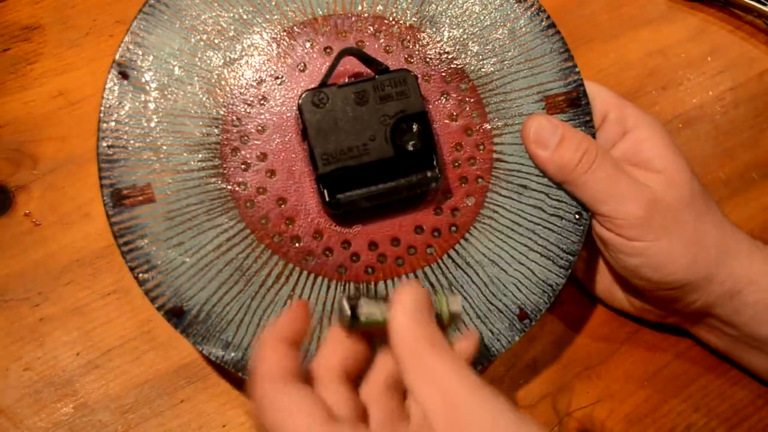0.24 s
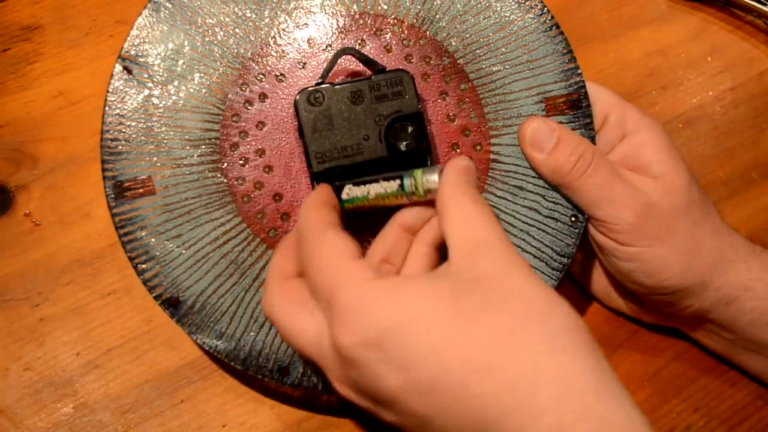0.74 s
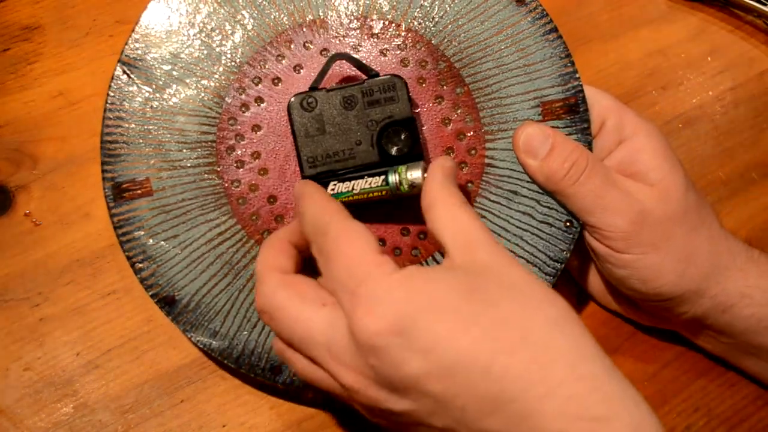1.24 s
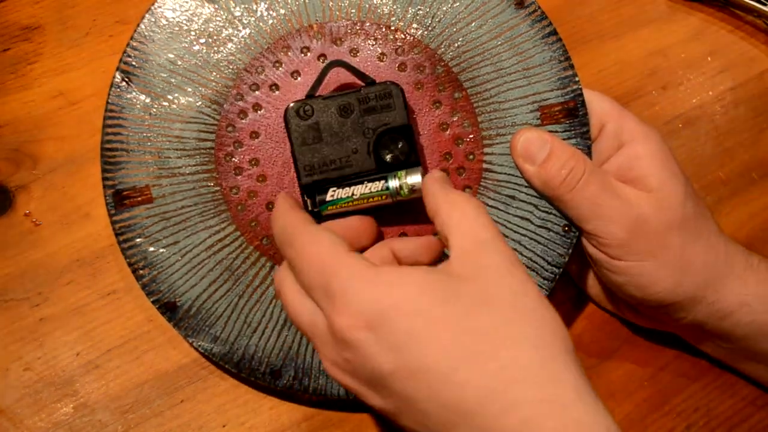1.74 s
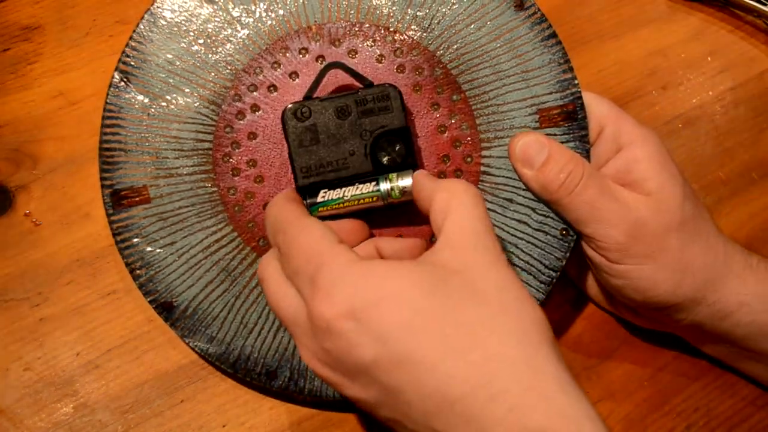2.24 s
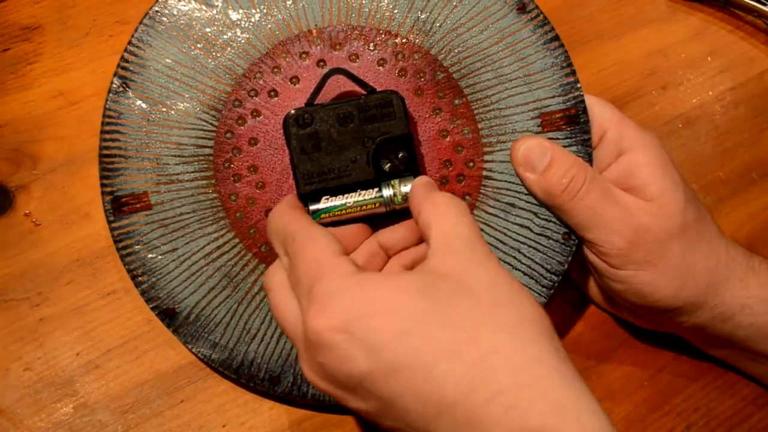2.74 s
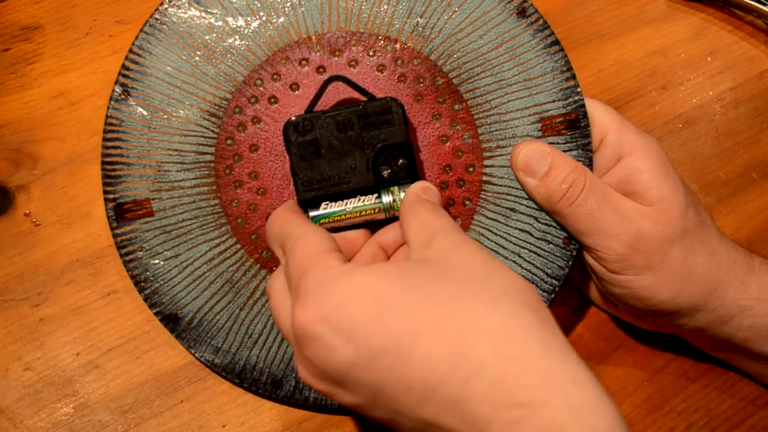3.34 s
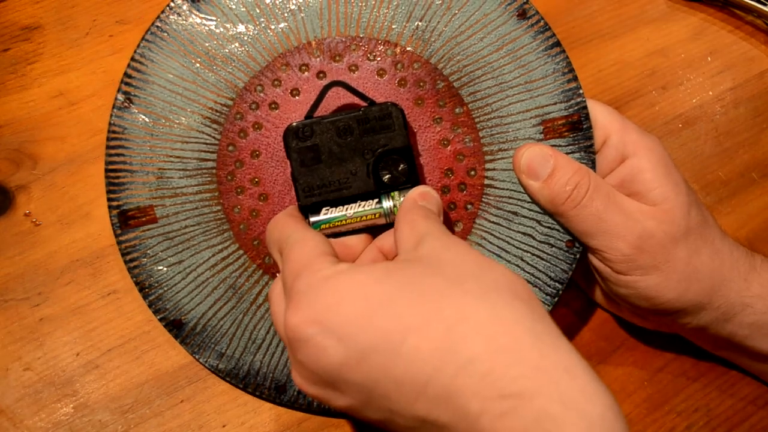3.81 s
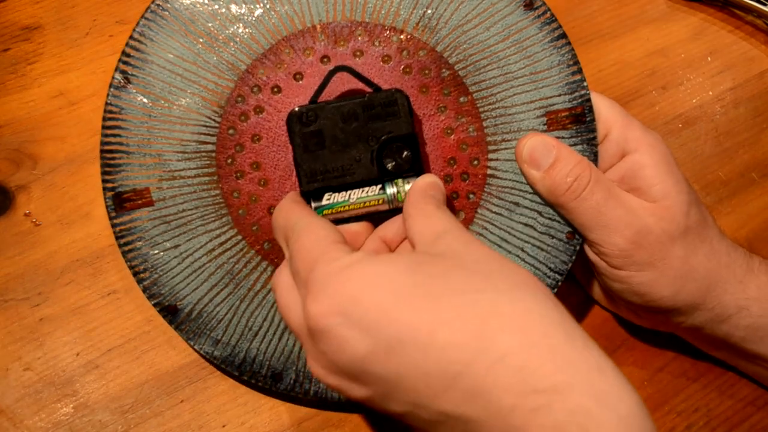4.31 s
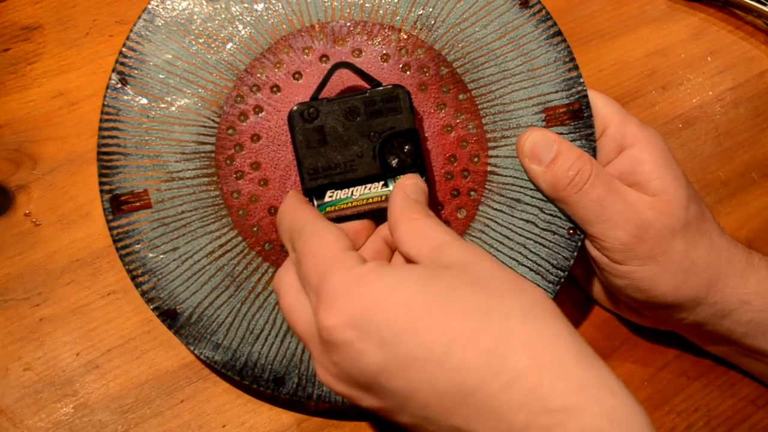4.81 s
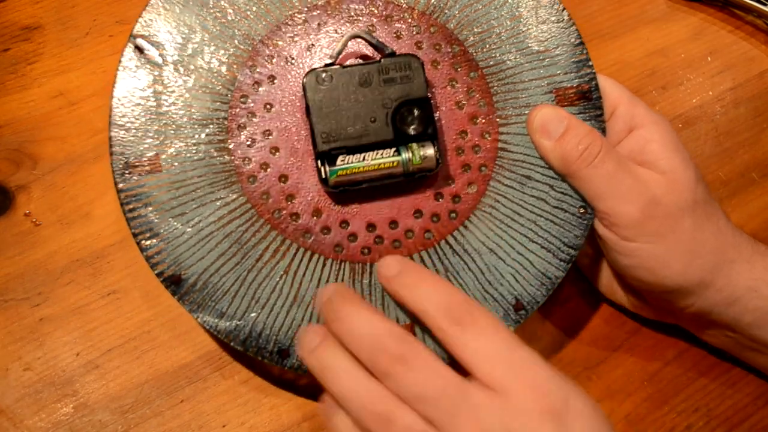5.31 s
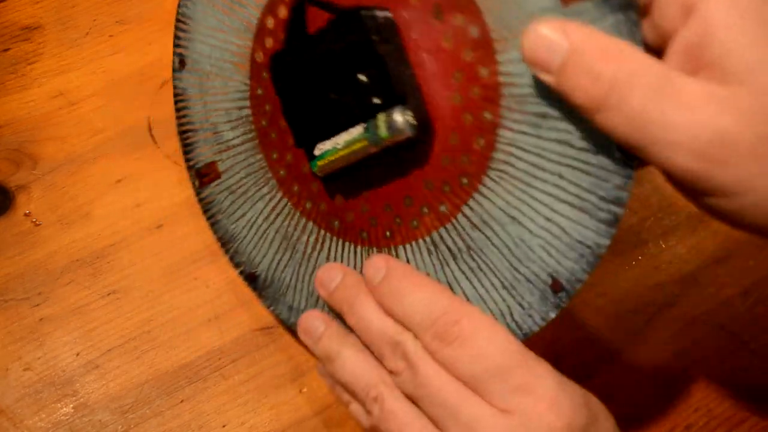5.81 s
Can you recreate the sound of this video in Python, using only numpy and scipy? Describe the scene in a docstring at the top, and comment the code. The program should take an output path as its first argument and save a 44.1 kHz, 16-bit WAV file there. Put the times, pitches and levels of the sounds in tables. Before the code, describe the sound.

Sparse plastic knocks and metallic ticks grow into a loud snap on a resonant ceramic plate, then a small clink, in a quiet small room.

```python
"""Room air rumbles and hisses throughout, with a thin high whistle: coloured noise and a sine.
A battery is pressed into the plastic holder on the back of a ceramic plate clock over a wooden bench.
Each contact ticks, knocks the holder and plate, and rings out in a small room: noise and dying sines.
Between and during contacts, short strokes of grainy noise slide; harder pushes bump the bench.
At the end the rim clinks: a ring of its own modes with a metal tick."""
import sys
import numpy as np
from scipy import signal
from scipy.fft import rfft, irfft, next_fast_len
from scipy.io import wavfile
from scipy.ndimage import map_coordinates

SR = 44100
rng = np.random.default_rng(int(sys.argv[2]) if len(sys.argv) > 2 else 0)


def dump_mix(stems):
    """Bounce the given channels to the path in sys.argv[1] as a 16-bit WAV at rate SR."""
    frames = np.atleast_2d(stems).T  # one column per channel
    limited = np.clip(frames, -1, 1)  # hard clip at full scale
    pcm = np.round(limited * 32767).astype(np.int16)
    wavfile.write(sys.argv[1], SR, pcm)


def nominal_scale(level):
    """Amplitude ratio for a level in decibels (scalar or array-like)."""
    x = np.asarray(level, float) / 20
    return 10 ** x


N = 267246  # length in samples


def along(points, hz):
    """Reads a curve of (pitch, value) points at any pitch, with pitch on a log axis."""
    point_hz, value = np.transpose(points)
    return np.interp(np.log(hz + 1), np.log(point_hz + 1), value)


def filtered(x, response):
    """Colours a sound by multiplying its spectrum by a response that depends on frequency."""
    size = next_fast_len(len(x) + 8192)
    spectrum = rfft(x, size) * response(np.fft.rfftfreq(size, 1 / SR))
    return irfft(spectrum, size)[:len(x)]


def unit(x):
    """Scales a sound to an rms level of 1."""
    return x / np.sqrt(np.mean(x ** 2) + 1e-20)


def wobble(rate):
    """Draws a smooth random curve through rate random points a second."""
    points = rng.standard_normal(int(N * rate / SR) + 4)
    return map_coordinates(points, [np.arange(N) * rate / SR])


def air():
    """Room air: wavering low rumble, hiss with humps as of a fan or pipe, and a thin whistle."""
    # shape of the rumble's spectrum: pitch_hz, relative level_db (per Hz)
    rumble_colour = [(12, -41.5), (20, -4.5), (22, -17.5), (33, -26), (70, -10), (97, -10), (131, -2.5),
                     (150, 0.5), (193, -7.5), (226, -7), (256, -14), (283, -13.5), (300, -13), (390, -43),
                     (660, -120)]
    # average level of the rumble over time: time_s, level_db (rms)
    rumble_level = [(0, -59), (.45, -60), (1, -62), (2.3, -65), (3.5, -68), (5.2, -67.5), (6.06, -67)]
    # shape of the hiss's spectrum without humps: pitch_hz, relative level_db (per Hz)
    hiss_colour = [(120, -34.5), (200, -6), (440, -4), (481, -4), (870, -4.5), (1020, 0), (1240, -4.5),
                   (1390, -5.5), (2370, -13.5), (2940, -13), (5710, -28.5), (12600, -35), (14500, -51.5)]
    # humps in the hiss: centre_hz, width_hz, level_db (of the part added, against the plain hiss)
    hiss_humps = [(965, 33, 2.5), (1880, 100, -5), (2940, 110, -2), (3520, 32, 9.5)]
    # whistle tones: pitch_hz, average level_db (rms)
    whistle_tones = [(15665, -80)]
    t = np.arange(N) / SR

    rumble = unit(filtered(rng.standard_normal(N), lambda hz: nominal_scale(along(rumble_colour, hz))))
    rumble_db = np.interp(t, *np.transpose(rumble_level)) + 0.53 * wobble(6.6)

    def humped(hz):
        humps = sum(nominal_scale(db) / (1 + (2 * (hz - centre_hz) / width_hz) ** 2)
                    for centre_hz, width_hz, db in hiss_humps)
        return nominal_scale(along(hiss_colour, hz)) * (1 + humps)

    hiss = unit(filtered(rng.standard_normal(N), humped))
    hiss_db = -60.5 + 0.4 * wobble(5)

    # the square root of 2 turns an rms level into the height of a sine
    whistle = sum(np.sqrt(2) * nominal_scale(db + 0.6 * wobble(12)) * np.sin(2 * np.pi * hz * t)
                  for hz, db in whistle_tones)
    return nominal_scale(rumble_db) * rumble + nominal_scale(hiss_db) * hiss + whistle


def ring(modes, scatter_db, attack):
    """Dying sines struck together, with randomly scattered strengths; attack in s, peak 1."""
    t = np.arange(SR // 2) / SR
    hz, db, t60 = np.transpose(modes)[:, :, None]
    db = db + scatter_db * rng.standard_normal(db.shape)
    sines = nominal_scale(db - 60 * t / t60) * np.sin(2 * np.pi * hz * t)
    x = np.sum(sines, axis=0) * (1 - np.exp(-t / attack))
    return x / np.max(np.abs(x))


def room(x):
    """The small room: a fresh tail of fading noise for each blow, after the first walls answer."""
    # how fast the room dies away: pitch_hz, t60_s (time to fall by 60 dB)
    room_decay = [(200, 0.32), (850, 0.19), (2000, 0.19), (5000, 0.19), (10000, 0.16), (15000, 0.12)]
    # colour of the room's answer: pitch_hz, level_db
    room_colour = [(200, -5), (900, -9.5), (1500, -10), (2500, -8.5), (5000, -11), (10000, -3.5),
                   (15000, -8)]
    hz, t, z = signal.stft(rng.standard_normal(SR // 2), SR, nperseg=256)
    fade = nominal_scale(-60 * t / along(room_decay, hz)[:, None])
    # equal energy at every pitch, so that only room_colour sets the balance
    fade /= np.sqrt(np.sum(fade ** 2, axis=1, keepdims=True))
    tail = signal.istft(z * fade, SR, nperseg=256)[1]
    tail = filtered(tail / np.linalg.norm(tail), lambda f: nominal_scale(along(room_colour, f)))
    delayed_tail = np.pad(tail, (round(0.003 * SR), 0))  # 3 ms
    return signal.fftconvolve(x, delayed_tail)[:len(x)]


def add(track, start_s, blow):
    """Lays a blow and its room tail on the track."""
    track[round(start_s * SR):][:len(blow)] += blow + room(blow)


def knock(hz, fade_ms):
    """A dense cluster of plate modes: it swells, fades and falls out of step, sagging to hz; peak 1."""
    t = np.arange(SR // 2) / SR
    u = 1000 * t / fade_ms
    pitch_hz = hz * (1 + 0.087 * np.exp(-2.5 * u))
    phase = 2 * np.pi * np.cumsum(pitch_hz) / SR
    swell = 1 - np.exp(-t / 0.003)
    fade = np.exp(-0.6 * u - (1.1 * u) ** 5)
    x = swell * fade * np.sin(phase)
    return x / np.max(np.abs(x))


def tick(db):
    """A hard edge of metal followed by a short splutter of micro-contacts; peak at db."""
    # colour of battery and spring at a strength of -20 dB: pitch_hz, relative level_db (per Hz)
    tick_colour = [(1200, -29), (2300, 4), (3000, 2), (4100, 4), (5000, 4.5), (6100, -4.5), (7300, -1.5),
                   (8800, -9), (11000, -8.5), (14000, -12.5), (16500, -23.5)]
    hz = np.fft.rfftfreq(2048, 1 / SR)
    # harder ticks are brighter: each dB over -20 tilts the colour up, by 0.05 dB an octave far above 4 kHz
    brighter_db = 0.05 * (db + 20) * np.log2(1 + hz / 4000)
    cepstrum = irfft(np.log(nominal_scale(along(tick_colour, hz) + brighter_db)))
    # folding the cepstrum makes the colour causal: nothing sounds before the edge
    cepstrum[1:1024] *= 2
    cepstrum[1025:] = 0
    edge = irfft(np.exp(rfft(cepstrum)))

    t = np.arange(SR // 2) / SR
    splutter = 0.15 * nominal_scale(-60 * t / 0.013) * rng.standard_normal(len(t))
    splutter[0] = 1  # the first hard contact
    x = signal.fftconvolve(splutter, edge)[:len(t)]
    return nominal_scale(db) * x / np.max(np.abs(x))


def battery():
    """Each battery contact knocks holder and plate, excites their upper modes and ticks."""
    # contacts: start_s, knock_hz, knock_db, upper_db, tick_db (peak levels of the parts before the room)
    contacts = [(.684, 772, -27, -26, -49.5), (.737, 782, -46, -46, -57), (.872, 860, -42, -50, -64),
                (1.013, 920, -51, -44.5, -64), (1.023, 920, -48, -49, -68), (1.032, 870, -44, -42, -77),
                (1.06, 970, -42.5, -45, -49), (1.085, 960, -46, -42, -63), (1.1137, 825, -25, -27, -53),
                (1.437, 890, -39.5, -39, -30.5), (1.4405, 836, -23.5, -20, -30),
                (2.363, 905, -33.5, -38, -42.5), (2.387, 880, -46, -56, -68), (2.4951, 803, -13, -9, -8),
                (2.499, 877, -19.5, -16.5, -15.5), (3.067, 1040, -56, -44, -63),
                (3.189, 818, -47, -42, -59.5), (3.2055, 964, -28, -22.5, -33.5),
                (3.9729, 840, -39.5, -29.5, -37), (3.9754, 835, -2, -2, -5),
                (4.2339, 816, -37.5, -25.5, -35.5), (4.2946, 834, -38, -32.5, -49),
                (4.519, 832, -39.5, -40, -65), (5.079, 854, -55.5, -43, -56), (5.094, 1016, -61, -45, -59)]
    # upper modes of plate and holder: pitch_hz, relative level_db, t60_s (time to fall by 60 dB)
    upper_modes = [(1148, -4.5, 0.018), (1282, 0.5, 0.019), (1446, 6, 0.011), (1570, -2.5, 0.01),
                   (1612, -19.5, 0.063), (1870, -15.5, 0.076), (2144, -13.5, 0.014), (2525, -12, 0.013),
                   (2594, -14, 0.0094), (3320, -18.5, 0.04)]
    track = np.zeros(N + SR)
    for start_s, knock_hz, knock_db, upper_db, tick_db in contacts:
        fade_ms = 4.8 + 8 * np.exp((772 - knock_hz) / 60.3)  # deeper knocks last longer
        blow = nominal_scale(knock_db) * knock(knock_hz, fade_ms)
        blow += nominal_scale(upper_db) * ring(upper_modes, scatter_db=1.8, attack=0.0005)
        add(track, start_s, blow + tick(tick_db))
    return track[:N]


def fingers():
    """Skin and battery slide in grainy slips over plastic and glaze."""
    # strokes: middle_s, half_length_s (until down to 1/e), level_db (rms at the middle)
    rubs = [(1.07, 0.088, -68.5), (3.076, 0.015, -58.5), (5.092, 0.033, -65.5), (6.011, 0.028, -66.5)]
    # colour of the sliding: pitch_hz, relative level_db (per Hz)
    skin_colour = [(400, -25), (900, -2), (1600, 2), (2500, 1), (3500, -13), (5000, -4.5), (8000, -47),
                   (14000, -35)]
    t = np.arange(N) / SR
    strokes = sum(nominal_scale(db) * np.exp(-((t - middle_s) / half_length_s) ** 2)
                  for middle_s, half_length_s, db in rubs)
    slips = nominal_scale(4 * wobble(250)) * rng.standard_normal(N)
    return strokes * unit(filtered(slips, lambda hz: nominal_scale(along(skin_colour, hz))))


def bench():
    """The harder pushes bump the plate against the bench and leave it humming."""
    # bumps: start_s, thump_db, centre_hz (of the thump), hum_db (peak levels before the room)
    bumps = [(1.439, -47.5, 292, -51), (2.495, -48, 320, -42.5), (3.204, -50.5, 430, -63),
             (3.975, -24, 460, -18.5)]
    # low thump of plate and bench: pitch_hz, relative level_db, t60_s (time to fall by 60 dB)
    thump_modes = [(90, -1.5, 0.0052), (269, -2, .05), (337, -4, 0.08), (430, 0, .04), (460, -2.5, 0.073),
                   (584, 0, 0.027)]
    # slowly dying modes of the ceramic plate: pitch_hz, relative level_db, t60_s
    plate_modes = [(793, -6, 0.37), (840, -4.5, 0.36), (926, 1, 0.17), (967, -2.5, 0.26)]
    track = np.zeros(N + SR)
    for start_s, thump_db, centre_hz, hum_db in bumps:
        # the spot that touches decides which low modes answer; others lose up to 9 dB
        near = [(hz, db - min(6 * ((hz - centre_hz) / 90) ** 2, 9), t60)
                for hz, db, t60 in thump_modes]
        thump = nominal_scale(thump_db) * ring(near, scatter_db=0.5, attack=0.0074)
        hum = nominal_scale(hum_db) * ring(plate_modes, scatter_db=0.0, attack=0.007)
        add(track, start_s, thump + hum)
    return track[:N]


def rim():
    """The lifted plate rings clearly when its rim is touched."""
    # touches: start_s, ring_db, tick_db (peak levels before the room)
    clinks = [(5.9683, -32, -44.5), (6.0473, -49, -66)]
    # modes of the freely ringing rim: pitch_hz, relative level_db, t60_s (time to fall by 60 dB)
    rim_modes = [(818, -4.5, 0.029), (1854, -1.5, 0.055), (1885, -16, 0.37), (3000, -16.5, 0.024),
                 (3170, -20.5, 0.1), (4600, -12.5, 0.017), (5390, -17, 0.015), (6000, -16, 0.013),
                 (7600, -21, .028), (13600, -32, .015)]
    track = np.zeros(N + SR)
    for start_s, ring_db, tick_db in clinks:
        clink = nominal_scale(ring_db) * ring(rim_modes, scatter_db=0.0, attack=0.00023)
        add(track, start_s, clink + tick(tick_db))
    return track[:N]


def scene():
    """All sources at one microphone."""
    return (air() + battery() + fingers() + bench() + rim())[None]


def band_limit(x):
    """A steep low-pass at the top of the band."""
    return signal.sosfilt(signal.butter(12, 16540, fs=SR, output="sos"), x)


def record(dry):
    """The input stage squashes the loudest peak smoothly, below a ceiling of 0.99."""
    squashed = dry / (1 + np.abs(dry / 0.99) ** 6) ** (1 / 6)
    return band_limit(squashed)


dry = scene()
out = record(dry)
dump_mix(out)
```